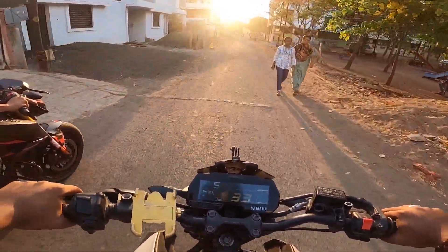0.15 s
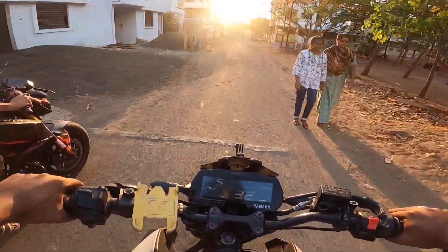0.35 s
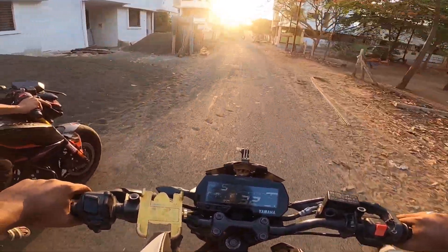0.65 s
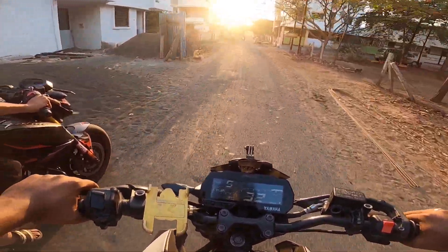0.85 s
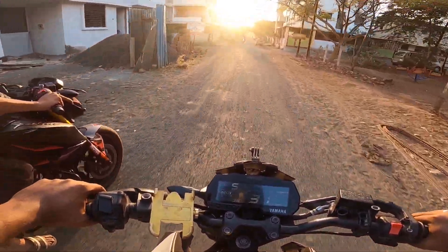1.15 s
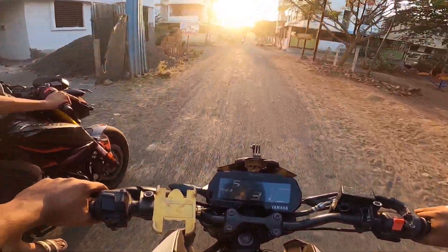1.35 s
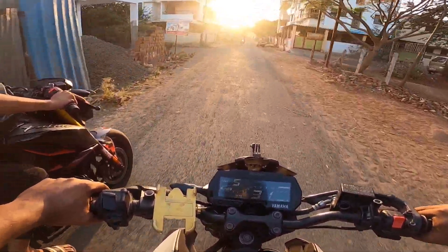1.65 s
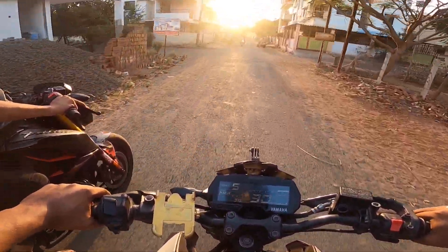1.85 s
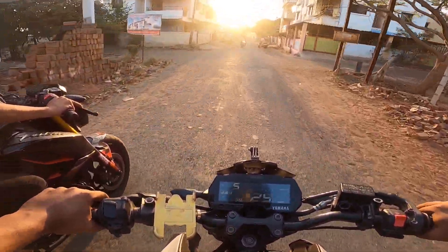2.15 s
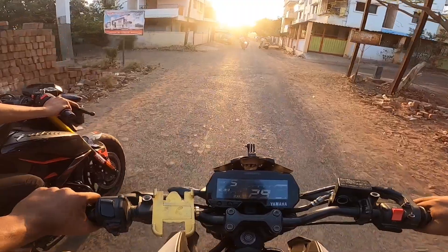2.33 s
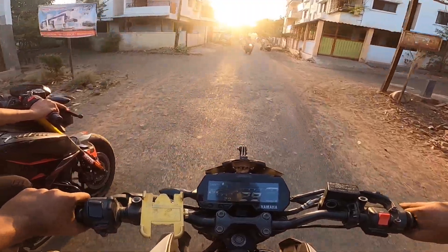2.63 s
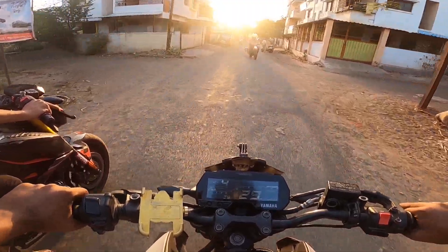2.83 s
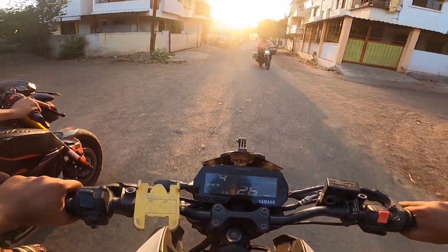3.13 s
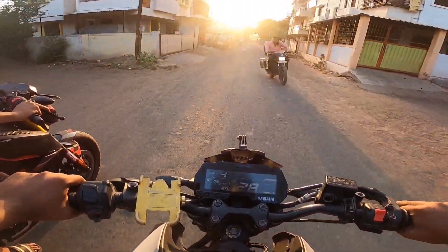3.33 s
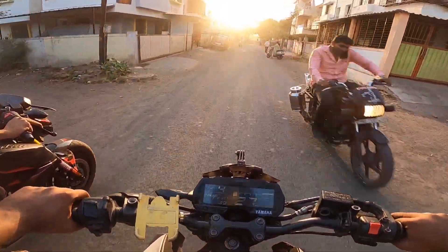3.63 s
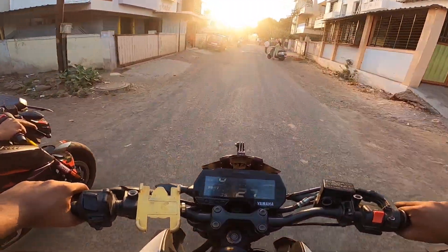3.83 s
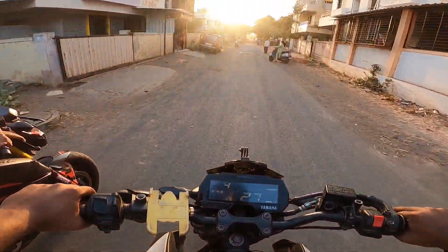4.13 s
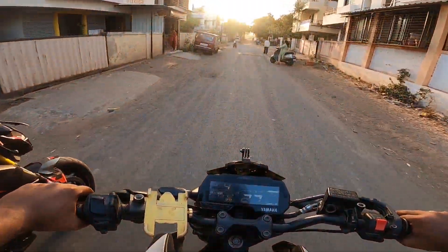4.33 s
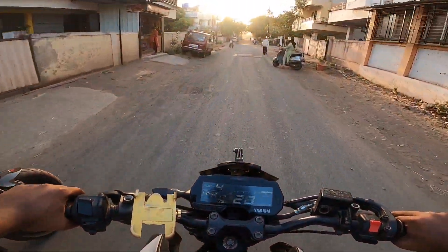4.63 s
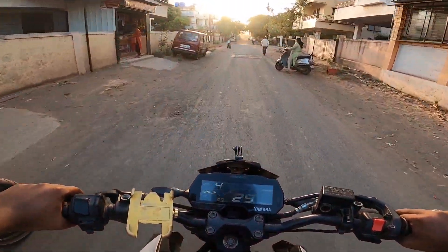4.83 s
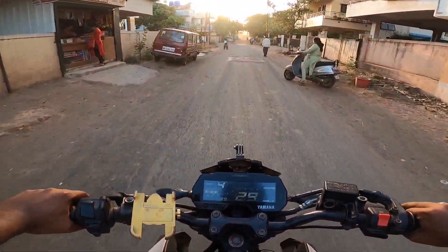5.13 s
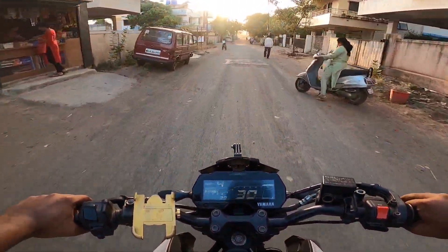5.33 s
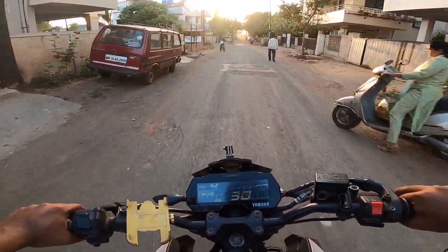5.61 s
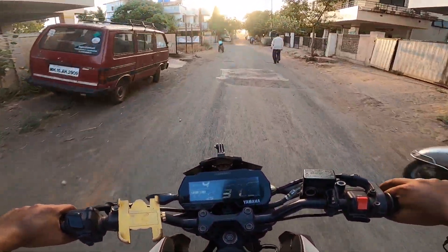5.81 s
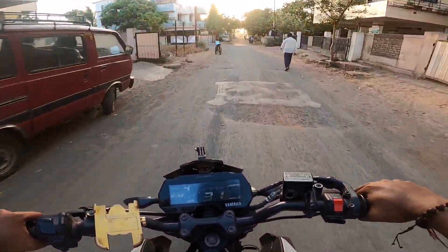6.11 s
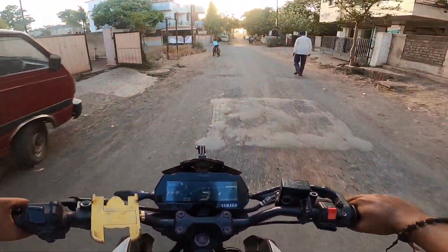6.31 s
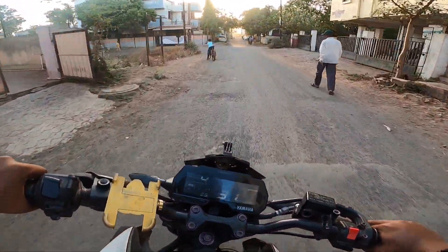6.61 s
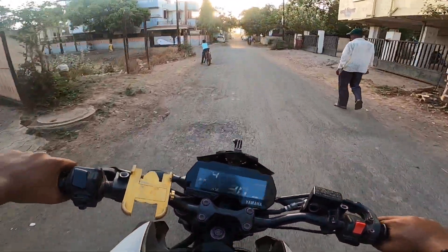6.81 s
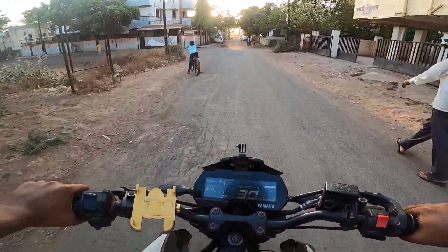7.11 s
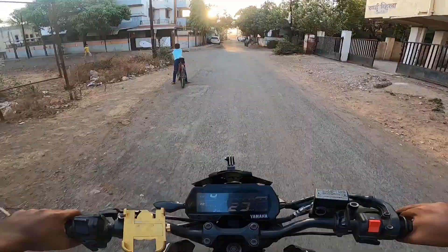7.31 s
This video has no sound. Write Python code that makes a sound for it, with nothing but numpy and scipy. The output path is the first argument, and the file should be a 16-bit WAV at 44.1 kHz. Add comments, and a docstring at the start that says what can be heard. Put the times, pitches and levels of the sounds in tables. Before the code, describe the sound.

Heard from the rider's position outdoors, an open single-cylinder exhaust beats deeply at about 22 thumps per second, with a resonant boom near 100 Hz and hollow upper barks. From 0 to 2.8 s it coasts down unevenly, extra-strong pops landing every fifth of a second or so, some with dry cracks. The beat sags to about 13 per second at 2.9, then the throttle snaps open and it climbs into a fuller, steadier bark, rising slowly to 26 by 6. A thin rough whine sits faintly within 3.6-6. At 3.95 an oncoming motorcycle brushes past in a short hiss. Around 5-6 nearby walls return a tight slap. After 6 the engine drops quickly to slow, ragged thumps with a few weaker pops, and a small throttle bark near 7. Tyre drone, gritty hiss, occasional knocks and rattles, and low buffeting wind persist.

```python
"""The open pipe of a single-cylinder motorcycle, heard at two microphone ports on the rider in a street.
Struck pipe tones make each thump and bark, some firings extra strong; low breathy noise lies under them.
The engine slows near the end. A wall echoes the pipe; a thin whine and mid-pitched knocks are added.
Shaped noise makes the case and tyre drone, road hiss, rattles, a passing motorcycle and wind."""
import sys
import numpy as np
from scipy import signal
from scipy.fft import rfft, irfft, next_fast_len
from scipy.io import wavfile
from scipy.ndimage import uniform_filter1d

SR = 44100
rng = np.random.default_rng(int(sys.argv[2]) if len(sys.argv) > 2 else 0)


def log_audio(samples):
    """Write samples as a 16-bit WAV file to the path given in sys.argv[1]."""
    # one column per channel
    frames = np.atleast_2d(samples).T
    # limit to full scale, then quantise
    limited = np.clip(frames, -1, 1)
    pcm = np.round(limited * 32767).astype(np.int16)
    wavfile.write(sys.argv[1], SR, pcm)


N = 328986  # samples in the scene

# The rider's hand and the burn; level is set before the pipe tones and slow swings.
# Columns: t/s, throttle [0-1], thump level/dB, scatter between cycles [dB]
THROTTLE = [(0, 0.16, -18.5, 3), (1.5, 0.08, -16.5, 3), (2.45, 0.2, -20, 5), (2.87, 0.14, -23, 3.5),
            (2.92, 0.85, -16, 0.5), (3.4, 0.61, -15, 1.96), (4.0, 0.62, -13.5, 2.7), (4.8, 0.47, -14, 1.0),
            (6.0, 1, -19, 1.5), (6.03, 0.14, -17.5, -1.5), (6.16, 0.37, -14, 1), (6.22, 0.54, -20, 3.5),
            (6.5, 0.03, -20.5, 1), (6.79, 0.1, -19, 2), (6.82, 0.26, -18.5, 6.2), (6.86, 0.54, -20.5, 7),
            (6.89, 0.4, -20.5, 0.5), (6.93, 0.3, -17, 2), (6.96, 0.46, -13.5, -3.2), (7.35, 0.51, -15, 2),
            (7.39, 0.54, -23, -0.5), (7.46, 0.05, -9, -2)]
# Gas heat and flow bend the pipe's pitch; a wall close by sends the bark back.
# Columns: t/s, pitch ratio of long tone, pitch ratio of upper tones, echo level/dB
STREET = [(0, 0.94, 0.95, -22), (1.5, 0.91, 1, -58), (2.9, 0.95, 0.93, -23), (3.2, 0.99, 1.015, -38),
          (4.6, 1.04, 1.004, -19), (4.95, 1.03, 1.06, -8), (5.3, 0.99, 0.99, -3), (5.6, 1.02, 1.015, -6.5),
          (6, 1.018, 1, -8), (6.15, 0.936, 0.945, -6.5), (6.3, 0.96, 1.02, -6), (6.6, 0.99, 0.91, -18),
          (7.2, 0.97, 0.98, -4), (7.46, 1.06, 0.95, -7)]
# Slow swings of the burn: dB per dB of scatter at full throttle, steps per second
STUMBLE, STUMBLE_HZ = 0.3, 10


def exhaust():
    """The pipe rings at every firing over a breathy noise, and returns from the wall."""
    throttle, thump_db, scatter_db = curves(THROTTLE)
    swing_db = -STUMBLE * scatter_db * throttle * walk(STUMBLE_HZ)
    level = undb(thump_db + swing_db)
    thump, second, bark = cycles(throttle, scatter_db)
    breath = breathy_noise(throttle, scatter_db)
    boom, strong_bark = strong_firings()
    bright = bark * level + strong_bark
    echo = wall_echo(bright, second * level)
    return (thump + breath + second) * level + boom + bright + echo


# The pipe's long, second and upper tones; the second also has a long tail.
# Columns of all three: f/Hz, level/dB, t60/s (time to fade by 60 dB)
LONG_MODES = [(100.54, 0.5, 0.21)]
BODY_MODES = [(232.3, 0.5, 0.064), (220.8, -10.5, 0.26)]
SHORT_MODES = [(328.7, -5.5, 0.045), (386.6, 1, 0.05), (492, -3.5, 0.049)]
# Levels over the thump [dB], throttle shut and open, at 22 firings per s; then dB per firing per s
BARK_DB, BARK_DB_PER_HZ = (-13.5, 3.5), 0.5  # upper tones, weaker only below 22 firings per s
SECOND_DB, SECOND_DB_PER_HZ = (-15, -4.5), -0.95  # second tone, stronger when slow


def cycles(throttle, scatter_db):
    """Each firing thumps the whole pipe, and the burn adds a bark in its upper tones."""
    times = firing_times()
    thump_chance, bark_chance, time_chance = rng.standard_normal((3, len(times)))
    at = (times * SR).astype(int)
    loose = scatter_db[at]
    flow, heat, _ = curves(STREET)
    faster = faster_than_22()
    bark_db = between(BARK_DB, throttle) + BARK_DB_PER_HZ * np.minimum(faster, 0)
    second_db = between(SECOND_DB, throttle) + SECOND_DB_PER_HZ * faster
    times = times + .00006 * loose ** 2 * time_chance
    # a weak, uneven charge leaves the pipe later
    thump_gain = undb(.5 * loose * thump_chance)
    thump = play(times - .0030 + .0005 * loose, thump_gain, ring(LONG_MODES, .004), flow[at])
    # the second tone begins with a suction as the valve opens (minus sign)
    second_gain = -undb(second_db[at] + loose * bark_chance)
    second = play(times - .0022, second_gain, ring(BODY_MODES, .003), heat[at])
    bark_gain = undb(bark_db[at] + loose * bark_chance)
    bark_shape = suction(ring(SHORT_MODES, .0028))
    bark = play(times - .0022 - LEAD_S, bark_gain, bark_shape, heat[at])
    return thump, second, bark


# Engine speed. Columns: t/s, firing rate f/Hz
SPEED = [(0, 22.48), (1.75, 20.75), (2.42, 19.38), (2.9, 13.45), (3.15, 23.37), (3.4, 23.92), (3.44, 21.91),
         (4.25, 22.84), (5.15, 24.61), (6.02, 25.99), (6.2, 22.55), (6.42, 17.09), (6.81, 15.89),
         (6.92, 13.39), (7.46, 14.74)]
FIRST_FIRING_CYCLES = .55  # shifts the start of the count


def crank():
    """Adding up the firing rate counts the firing cycles completed at each sample."""
    return np.cumsum(curves(SPEED)[0]) / SR - FIRST_FIRING_CYCLES


def firing_times():
    """The cylinder fires whenever the count reaches a whole number; gives seconds."""
    count = crank()
    return np.interp(np.arange(int(count[-1]) + 1), count, np.arange(N) / SR)


def faster_than_22():
    """Engine speed above 22 firings per second, which shifts the pipe's tone levels."""
    return curves(SPEED)[0] - 22


LEAD_SHARE, LEAD_S = .4, .0014  # strength and lead [s] of the pressure rise


def suction(shape):
    """The pressure shape upside down: a small rise runs ahead of the suction."""
    lag = np.zeros(int(LEAD_S * SR))
    return LEAD_SHARE * np.append(shape, lag) - np.append(lag, shape)


# Extra-strong firings; levels are set before the trims below.
# Columns: t/s, bark level/dB, thump level/dB, crack level/dB
STRONG_FIRINGS = [(0.379, -12, -24, -33), (0.606, -14, -42, -35), (0.835, -11, -17, -24),
                  (1.065, -11, -11, -34), (1.253, -11.5, -12.5, -33), (1.442, -10.5, -13, -35),
                  (1.827, -10, -28, -33), (2.174, -11.5, -18, -43), (2.325, -15.5, -15.5, -62),
                  (2.535, -19.5, -28, -48), (2.593, -24, -18.5, -41), (2.781, -24, -20, -54),
                  (6.305, -21.5, -44, -51), (6.634, -15.5, -14.5, -56), (6.694, -20, -27, -45),
                  (6.827, -21.5, -24, -66)]
# Colour of their crack. Columns: f/Hz, level/dB per Hz
CRACK = [(500, -22), (750, 20.5), (1050, 18.5), (1300, -8), (1520, 10), (1900, -2), (2400, -40)]


def strong_firings():
    """An extra-strong firing strikes all the pipe tones, some with a clear short crack of noise."""
    strong_s, bark_db, thump_db, crack_db = np.transpose(STRONG_FIRINGS)
    at = (strong_s * SR).astype(int)
    heat = curves(STREET)[1][at]
    faster = faster_than_22()[at]
    bark_gain = undb(bark_db - 6.5 + BARK_DB_PER_HZ * np.minimum(faster, 0))
    bark = play(strong_s + .003, bark_gain, suction(ring(SHORT_MODES, .0014)), heat)
    second_gain = -undb(bark_db - 6 + SECOND_DB_PER_HZ / 2 * faster)
    boom = play(strong_s + .0038, second_gain, ring(BODY_MODES, .003), heat)
    boom += play(strong_s + .0026, undb(thump_db), ring(LONG_MODES, .004), heat)
    t = np.arange(SR // 20) / SR
    burst = 2 * (np.exp(-t / 0.0084) - np.exp(-t / 0.00089))  # quick rise, slower fade
    crack = play(strong_s + 0.0019, undb(crack_db - 2.5), burst) * noise(CRACK)
    return boom, bark + crack


# Colour of the breathy noise. Columns: f/Hz, level/dB per Hz
BREATH = [(60, -1), (110, 1), (160, 6.5), (240, -13.5), (400, -12.5), (600, -54), (1200, -110)]
# Over the thump [dB], throttle shut, at 22 firings per s; then dB per firing per s
BREATH_DB, BREATH_DB_PER_HZ = -19, -0.04


def breathy_noise(throttle, scatter_db):
    """Steady low noise under the firings: a hum at the long pipe tone, and breath when throttle shuts."""
    low = ring(LONG_MODES, .004)
    hum = unit(signal.fftconvolve(rng.standard_normal(N), low)[:N])
    breath_db = BREATH_DB + BREATH_DB_PER_HZ * faster_than_22() + 0.4 * walk(30)
    shut = np.clip(1 - throttle, 0, 1)
    return 0.018 * scatter_db * hum + undb(breath_db) * shut * noise(BREATH)


# Round trip to the wall, before its drift. Columns: t/s, delay [s]
WALL = [(0, .0206), (5.05, .0206), (5.3, .0215), (5.55, .0215), (5.62, .0221), (7.46, .0221)]
WALL_DRIFT_S = 0.0002  # typical wander of the delay
WALL_DULL_DB = -4.5  # the second tone returns weaker than the upper ones


def wall_echo(bright, second):
    """The wall returns the bark late, by a delay that wanders with its distance."""
    clock = np.arange(N) / SR
    sent = bright + undb(WALL_DULL_DB) * second
    delay = curves(WALL)[0] + WALL_DRIFT_S * walk(1.5)
    return undb(curves(STREET)[2]) * np.interp(clock - delay, clock, sent)


# A thin rough whine while the bike pulls. Columns: t/s, pitch f/Hz, level/dB before roughness
WHINE = [(3.55, 1180, -77), (3.75, 1170, -49), (4.15, 1223, -47), (4.7, 1161, -51), (5.4, 1233, -51.5),
         (5.95, 1261, -49.5), (6.08, 1320, -73)]


def whine():
    """One sine with a sliding pitch, made rough by fast random changes of strength."""
    hz, db = curves(WHINE)
    return undb(db) * walk(130) * np.sin(2 * np.pi * np.cumsum(hz) / SR)


# Short mid-pitched knocks, one of them on a firing. Columns: t/s, burst level/dB, centre f/Hz
KNOCKS = [(1.189, -32, 1070), (2.261, -41.5, 1590), (2.722, -36.5, 1020), (2.974, -34, 910),
          (3.500, -39, 1350), (3.519, -37, 885), (4.119, -34.5, 900), (5.606, -45, 730)]
KNOCK_T60_S, KNOCK_WIDTH = 0.11, 0.45  # fade by 60 dB [s]; half width as a share of the pitch


def knocks():
    """Each knock is a fading burst of noise in a band around its pitch."""
    t = np.arange(SR // 5) / SR
    shape = 1000. ** (-t / KNOCK_T60_S) * (1 - np.exp(-t / 0.0012))
    out = np.zeros(N)
    for s, db, hz in KNOCKS:
        band = [(hz * (1 - KNOCK_WIDTH), -25), (hz * 1.06, 0), (hz * 0.96, 0),
                (hz * (1 + KNOCK_WIDTH), -20), (3 * hz, -90)]
        out += play(s, undb(db), shape) * noise(band)
    return out


# Colour of the hum. Columns: f/Hz, level/dB per Hz
DRONE = [(100, -54), (200, -11), (400, -14.5), (520, -17), (707, -24.5), (860, -21), (1060, -19),
         (1300, -24.5), (2000, -34.5), (3000, -53.5), (4000, -98)]


def drone(db):
    """Engine case, chain and tyres: rough hum noise, and a part opposite in sign at the two ports."""
    spread = noise([(80, -5), (150, -9), (300, -2.5), (550, -10), (800, -19.5),
                    (1500, -54), (2500, -27), (4000, -48)])
    gain = undb(db + 0.46 * walk(12) + 0.1 * walk(4.08))
    return ports(gain * noise(DRONE), 2.15) + gain * 0.6 * spread * np.array([[1], [-1]])


# Colour of the hiss. Columns: f/Hz, level/dB per Hz
HISS = [(1180, -16), (2000, -8.5), (2370, -5), (3290, -8), (5140, -7.5), (5800, -9), (9700, -12),
        (12800, -19.5), (15600, -24)]
# Strength of the hiss above 11 kHz, before the left/right balance. Columns: t/s, factor
SHEEN = [(0, 0.77), (2.5, 1.85), (5, 1.3), (6.2, 0.78), (7.46, 0.38)]


def hiss(db):
    """Tyre grit reaches both ports as shared noise, and air hisses at each port alone."""
    own = np.array([noise(HISS), noise(HISS)]) * undb(np.array([[1.5], [-1.5]]))
    gain = undb(db + 1.1 * walk(14) + 0.84 * walk(6.0))
    out = gain * (0.37 * ports(noise(HISS), 4.8) + 0.67 * own)
    top = signal.sosfiltfilt(signal.butter(3, 11000, "high", fs=SR, output="sos"), out)
    return out + top * (curves(SHEEN)[0] * np.array([[1.2], [.7]]) - 1)


# Small rattles on the bike.
# Columns: t/s, burst level/dB, t60/s (time to fade by 60 dB), left minus right level/dB
RATTLES = [(0.804, -49, 0.26, 7), (0.9144, -55, 0.088, 12), (2.1575, -49, 0.074, 3.5),
           (2.7194, -45.5, 0.08, 7), (4.3485, -48, 0.12, -2), (6.774, -57, 0.04, 3), (6.8418, -49, 0.04, 5),
           (6.896, -48.5, 0.058, 6), (7.1836, -52.5, 0.08, 6)]


def rattles():
    """The bike's rattles are short fading bursts of gritty noise."""
    grit = ports(noise([(2000, -3), (4000, 11), (9000, 6.0), (15000, -24)]), 0)
    t = np.arange(SR // 5) / SR
    out = np.zeros((2, N))
    for s, level_db, t60, pan_db in RATTLES:
        burst = 1000. ** (-t / max(t60, .01)) * (1 - np.exp(-t / 0.00031))
        out += pair(play(s, undb(level_db), burst), pan_db) * grit
    return out


# Coarse road noise between drone and hiss. Columns: t/s, level/dB before flicker
RASP = [(0, -66.5), (2.4, -63.5), (3.0, -58), (3.6, -60), (6.2, -65.5), (6.6, -58), (7.0, -58.5),
        (7.46, -70)]
# Its colour. Columns: f/Hz, level/dB per Hz
RASP_COLOUR = [(900, -24), (1400, -0.5), (2000, -0.5), (3000, -11.5), (4500, -29)]


def rasp():
    """Tyres make grainy mid noise that flickers, with separate noise at the two ports."""
    gain = undb(curves(RASP)[0] + 3.1 * walk(60) + 1.5 * walk(8))
    return gain * np.array([noise(RASP_COLOUR), noise(RASP_COLOUR)])


# Colour of the passing hiss. Columns: f/Hz, level/dB per Hz
PASS_HISS = [(1500, -20), (3000, 2.5), (5000, 3), (8500, 3.5), (10500, -5), (13000, -25)]
PASS_S, PASS_COMING_S, PASS_GOING_S = 3.955, 0.11, 0.065  # nearest moment; half-strength times [s]
PASS_DRONE_DB, PASS_HISS_DB = 3, -51.5  # drone lift; hiss level before flicker


def nearness():
    """Closeness of the oncoming motorcycle, rising to 1 as it brushes by."""
    t = np.arange(N) / SR - PASS_S
    return 1 / (1 + (t / np.where(t < 0, PASS_COMING_S, PASS_GOING_S)) ** 2)


def passer(near):
    """The oncoming motorcycle is flickering hiss, with separate noise at the two ports."""
    return near * undb(PASS_HISS_DB + 2.2 * walk(40)) * np.array([noise(PASS_HISS), noise(PASS_HISS)])


# Levels before flicker and port balance. Columns: t/s, drone level/dB, hiss level/dB
ROAD = [(0, -40.5, -55.5), (.7, -41, -56.5), (.85, -37.5, -53), (1.7, -40.5, -54), (3.1, -38, -52.5),
        (4.6, -41, -53.5), (5.1, -40, -54), (6.35, -45, -58), (6.9, -42.5, -55.5), (7.46, -40.5, -59.5)]


def road():
    """Rolling noise of the bike and street, with the other motorcycle going by."""
    drone_db, hiss_db = curves(ROAD)
    near = nearness()
    bike = drone(drone_db + PASS_DRONE_DB * near) + rattles()
    return bike + hiss(hiss_db) + passer(near) + rasp()


# Wind level before gusts and port gains. Columns: t/s, level/dB
BREEZE = [(0, -25), (.8, -31), (2.8, -27), (3.2, -33.5), (4.5, -31), (5.2, -34.5), (5.7, -33),
          (6.25, -26.5), (6.5, -29.5), (7.0, -29), (7.46, -26)]
# Colour of the wind. Columns: f/Hz, level/dB per Hz
WIND = [(8, 8.5), (14, 1.5), (30, -5), (60, -8.5), (120, -13.5), (300, -28.5), (600, -80)]


def wind():
    """Gusts push on the ports as low noise, part shared and part separate, harder on the left."""
    both, left, right = noise(WIND), noise(WIND), noise(WIND)
    gust = undb(curves(BREEZE)[0] + 0.41 * walk(12))
    return gust * np.array([2.22 * both + 2.07 * left, 1.14 * both + 1.5 * right])


def undb(db):
    """Decibels to a plain factor."""
    return 10 ** (np.asarray(db) / 20)


def unit(x):
    """Scale to an rms (average strength) of 1."""
    return x / np.sqrt(np.mean(x ** 2))


def between(ends, share):
    """Slide from the first end to the second as share goes from 0 to 1."""
    return ends[0] + (ends[1] - ends[0]) * np.clip(share, 0, 1)


def curves(table):
    """Join the table's points by straight lines, one value per sample."""
    s, *columns = np.transpose(table)
    return [np.interp(np.arange(N) / SR, s, c) for c in columns]


def noise(spectrum):
    """Noise of rms 1, coloured by (f/Hz, level/dB) points."""
    hz, db = np.transpose(spectrum)
    size = next_fast_len(N)
    f = np.arange(size // 2 + 1) * SR / size + 1e-3  # keeps the logarithm finite
    colour = undb(np.interp(np.log(f), np.log(hz), db))
    return unit(irfft(rfft(rng.standard_normal(size)) * colour, size)[:N])


def walk(rate):
    """Random values, rate steps per second, smoothed twice and scaled to rms 1."""
    k = int(SR / rate)
    steps = np.repeat(rng.standard_normal(N // k + 1), k)
    return unit(uniform_filter1d(uniform_filter1d(steps, k), k)[:N])


def ring(modes, push_s):
    """Fading sines, struck by a smooth gas push lasting about push_s seconds."""
    t = np.arange(SR // 4) / SR
    free = sum(undb(db) * np.sin(2 * np.pi * f * t) * 1000. ** (-t / t60) for f, db, t60 in modes)
    push = np.hanning(int(push_s * SR) + 2)
    return np.convolve(free, push / push.sum())


def play(seconds, gains, shape, ratios=1.):
    """Add one copy of shape at each moment, its pitch scaled by the ratio."""
    out, n = np.zeros(N + len(shape)), np.arange(len(shape))
    for s, gain, ratio in np.broadcast(seconds, gains, ratios):
        start = min(max(int(s * SR), 0), N)
        out[start:start + len(n)] += gain * np.interp(n * ratio, n, shape)
    return out[:N]


def pair(x, pan_db):
    """Left and right copies, the left louder by pan_db."""
    return x * undb(np.array([[1], [-1]]) * pan_db / 2)


def ports(x, pan_db):
    """A sound from the left front reaches the right port four samples later."""
    left, right = pair(x, pan_db)
    return np.array([left, np.roll(right, shift=4)])


def scene():
    """The pipe, whine and knocks, mixed with the road and the wind."""
    bike = exhaust() + whine() + knocks()
    return ports(bike, 1.6) + road() + wind()


TOP_HZ = 15750  # upper edge of the sound


def record(dry):
    """The microphones weaken the deepest rumble, round the loudest peaks and cut the top."""
    dry = signal.sosfilt(signal.butter(1, 8, "high", fs=SR, output="sos"), dry)
    rounded = np.tanh(2.2 * dry) / 2.2
    return signal.sosfilt(signal.ellip(12, .2, 60, TOP_HZ, fs=SR, output="sos"), rounded)


dry = scene()
out = record(dry)
log_audio(out)
```